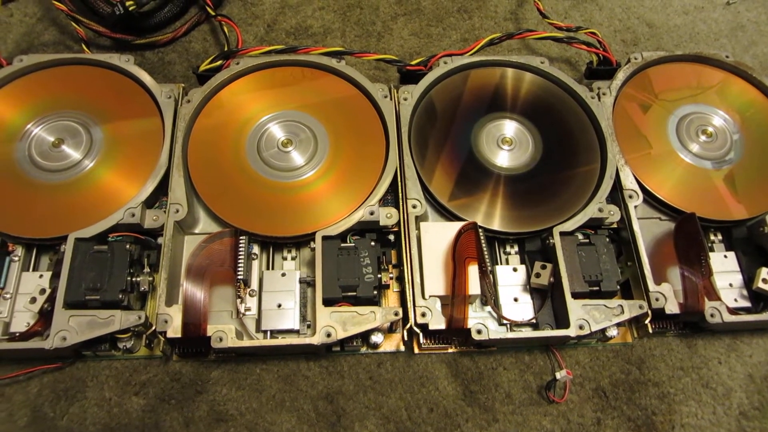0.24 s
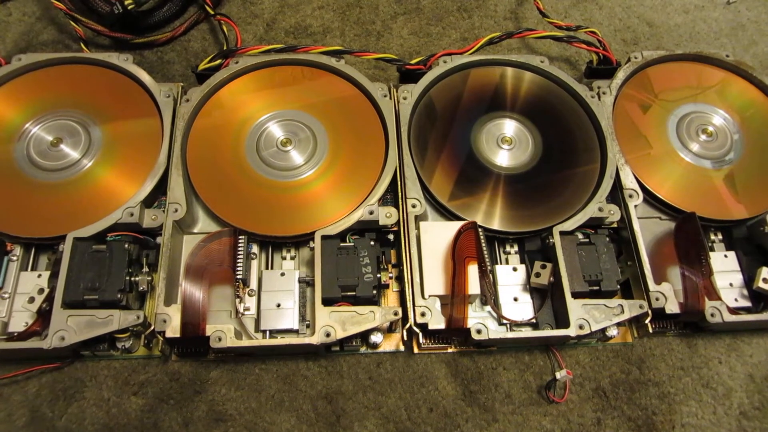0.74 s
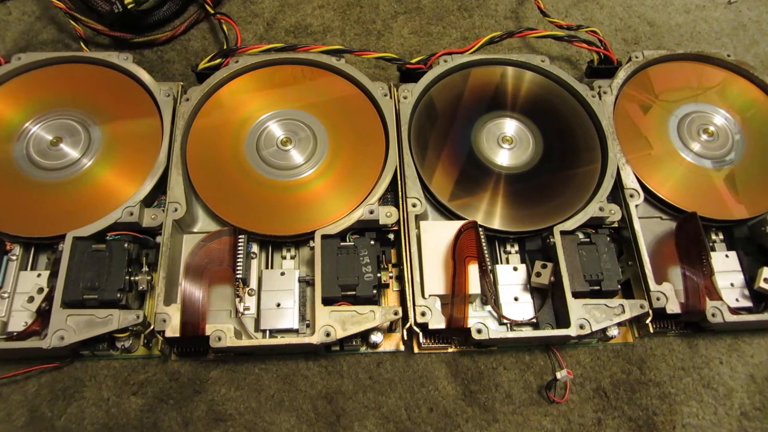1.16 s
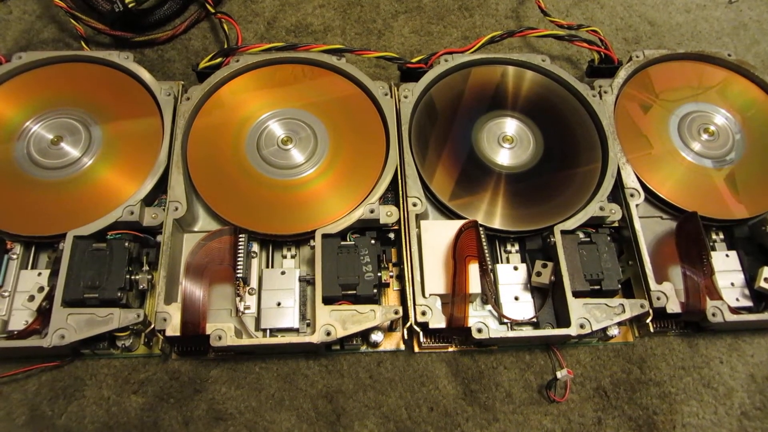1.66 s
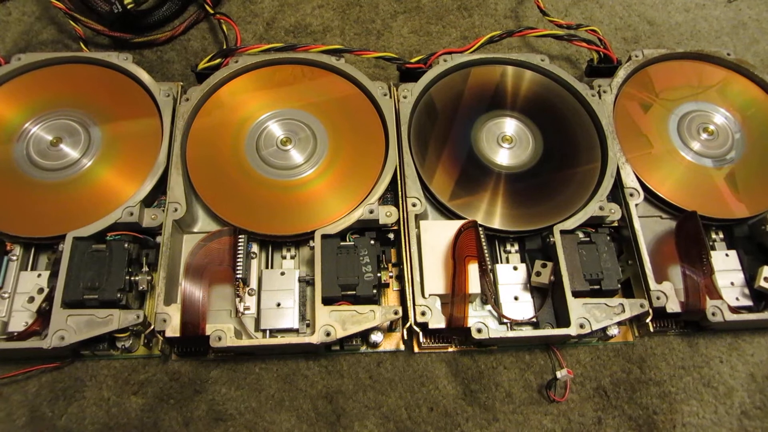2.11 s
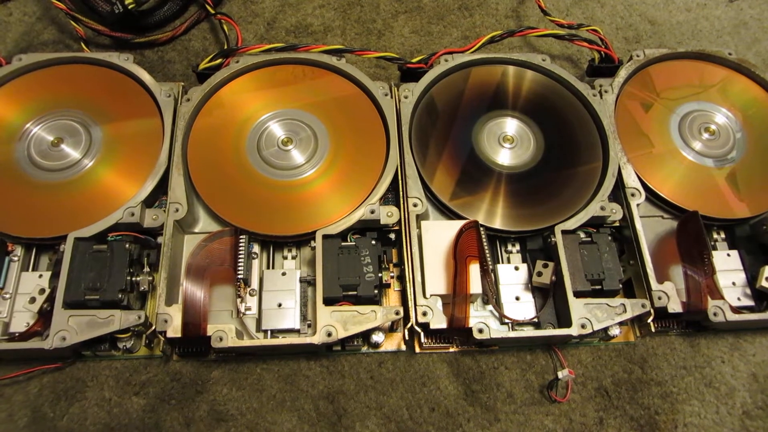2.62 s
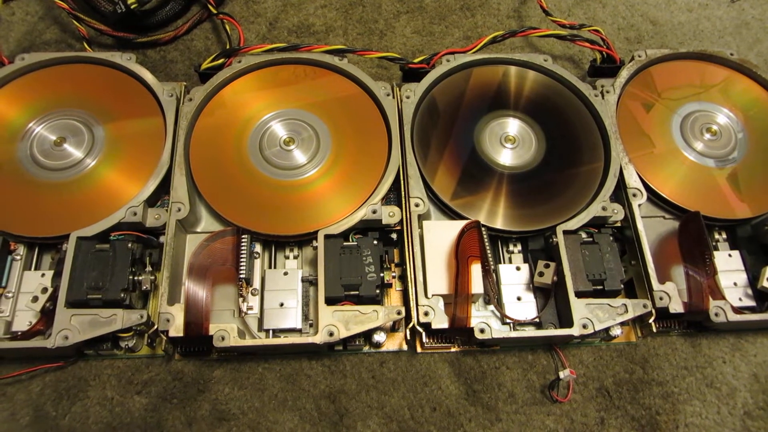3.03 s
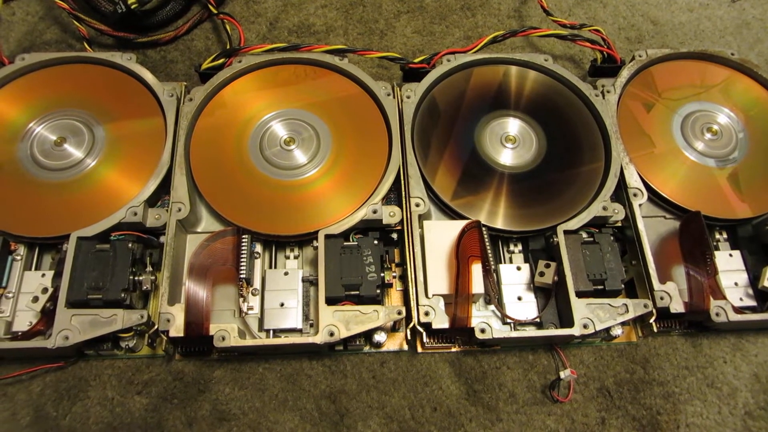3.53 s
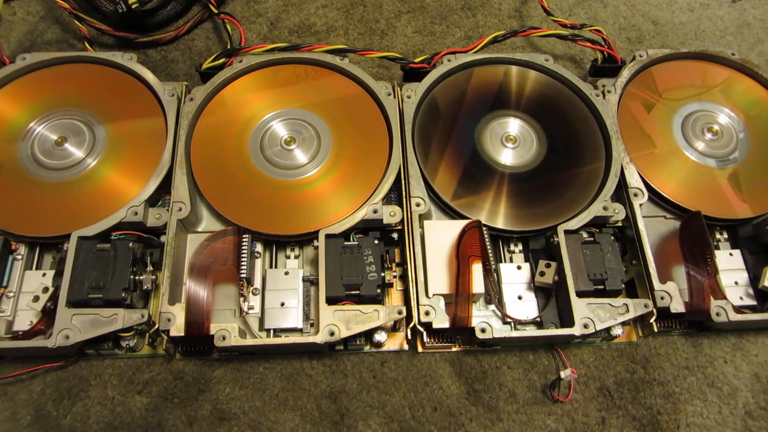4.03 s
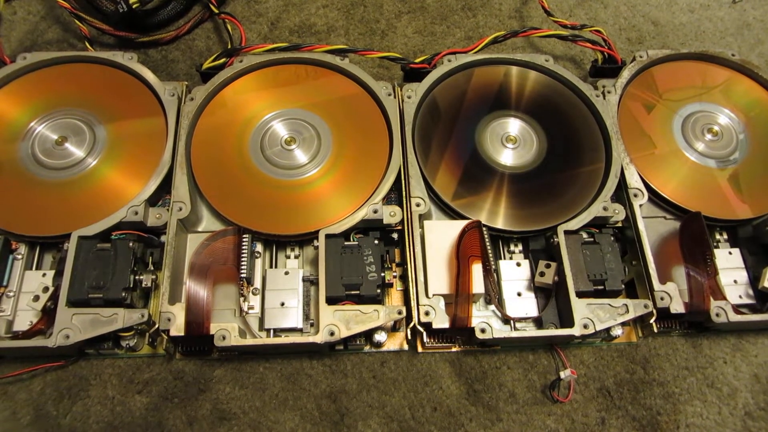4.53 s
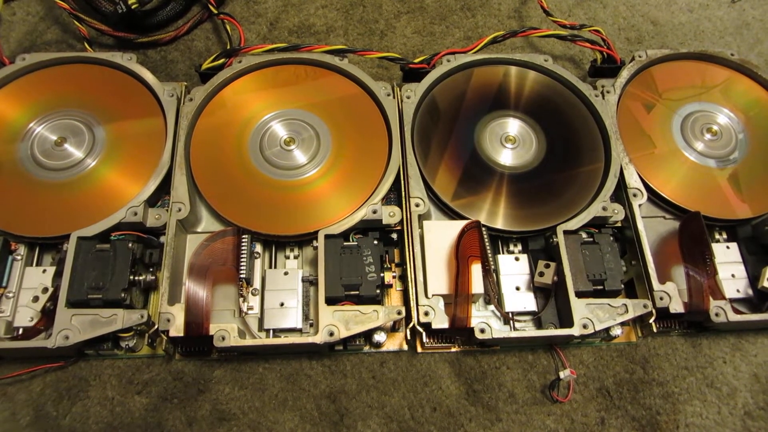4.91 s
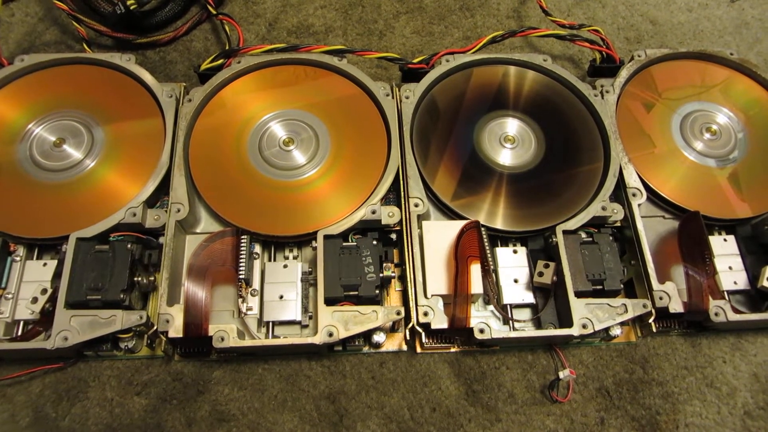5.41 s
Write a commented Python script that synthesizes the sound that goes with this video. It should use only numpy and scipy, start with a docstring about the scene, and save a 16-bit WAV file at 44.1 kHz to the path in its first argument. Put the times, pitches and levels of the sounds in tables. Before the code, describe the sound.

Close by in a quiet room, a group of open hard drives whirs up to speed. Layered motor whines and wavering, ringing bearing tones glide upward together above a constant hiss. The climb then stops and the drives hold a steady, high, many-toned whine, with a light buzz coming in underneath and a very faint electrical hum throughout.

```python
"""Several open hard drives spin up side by side on a carpet and lock at full speed.
Motor coils force the cast frames to vibrate at multiples of each shaft speed, so the hum rises in pitch.
Two ball bearings sing through the casting, while air and bearings whir and hiss in the frames.
Steady whines and a buzz join as the speeds lock. Beneath lie a brief low note, mains hum,
a screen's faint whistle, the quiet room and soft bumps of a hand on a small camera close by."""
import sys
import numpy as np
from scipy import signal
from scipy.fft import rfft, irfft, next_fast_len
from scipy.io import wavfile
from scipy.ndimage import uniform_filter1d

SR = 44100
rng = np.random.default_rng(int(sys.argv[2]) if len(sys.argv) > 2 else 0)


def digitize_waveform(pressure):
    """Quantize a signal to 16-bit integers and store it at the path in sys.argv[1].

    Rows of a 2-D input are taken as channels; values are limited to [-1, 1].
    """
    field = np.atleast_2d(pressure).T
    bounded = np.clip(field, -1, 1)
    quanta = np.round(bounded * 32767).astype(np.int16)
    wavfile.write(sys.argv[1], SR, quanta)


N = 249606

# Shaft rotation: start_hz, free_hz, time_constant_s, held_hz
FIRST_SHAFT = (34.353, 126.19, 13.036, 60.6)
SECOND_SHAFT = (34.8, 112.88, 11.145, 59.18)
THIRD_SHAFT = (37.0, 124.72, 11.886, 60.65)
# Driving force, one row a shaft: start_db, drift_db_per_s, lock_change_db, half_transition_s
MOTOR_EFFORT = [(0.5, 0, -4.5, 0.14), (-2, 0.5, -2, 0.26), (10, -2, -40, 0.34)]
# Motor partials, in parallel lists: order (multiple of shaft speed), level_db, lock_change_db
FIRST_MOTOR_ORDERS = [6, 12, 13, 16, 18, 19, 22, 23, 24, 25, 30, 36]
FIRST_MOTOR_DB = [15.5, 13, -3, -5.5, 10.5, -5.5, -11, -9, 9, -7, 8.5, 7]
FIRST_LOCK_DB = [-8, -0.5, 0.5, -12, -4, 10.5, -5, -7, -3.5, -3, -18, 10]
FIRST_UPPER_ORDERS = [28, 42, 42.95, 44, 44.95, 48, 54, 56.14, 58.13, 60, 64.03, 66, 89.9]
FIRST_UPPER_DB = [1, 3.5, -8.5, -5, -2, 2, 7, -3, -2, 10, -6, 8.5, -1]
FIRST_UPPER_LOCK_DB = [1, 4, 23.5, -3, 13, -14, -9, 5, 5, -12, 15, -3, 2]
THIRD_MOTOR_ORDERS = [6, 12, 18, 23.05, 24, 30]
THIRD_MOTOR_DB = [10.5, -1, -4, -11.5, -3, -10]
# Further motor tones that climb in step with the second shaft and ease at lock: order, level_db
FURTHER_TONE_ORDERS = [12.25, 18.38, 28.19, 31.75, 34.39, 36.77]
FURTHER_TONE_DB = [-3.5, -9, -7, 7, 6, 4]
# Second drive's bearing, one row a ball-pass harmonic with sidebands one shaft speed apart:
# two_below_db, one_below_db, carrier_db, one_above_db, two_above_db
BEARING_SIDEBANDS = [(-4, -2, 4, -2, -2), (-16, -6, 3, -1, -6), (-12, 3, 8.5, 5.5, -2),
                     (-7, 10.5, 11, 1, -4), (-4, 7, 6, 5, -6), (-3, 2, 9, 10.5, -8), (-5, 1, 8, 17, -2),
                     (-9, 0, 4, 4, -6), (-7, 1, 6, 3, -6), (-2, 10, 9, 7, -6), (-4, 8, 8, 8, -4),
                     (-4, 7, 7.5, 4, 1), (0, 2, 4, 0, 0), (-2, 3, -2, 0, -3), (-6, 4, 1, 0, 0),
                     (-8, 0, -8, -8, -8), (-8, -5, -2, -1, -6), (-6, -9, -2, -10, -7), (-9, 0, 0, 0, -4)]
# Swells and ebbs of that bearing: centre_s, change_db
BEARING_SWELLS = [(.15, 2.5), (.6, -3.5), (.85, 3.5), (1.15, -5), (1.45, 1), (1.68, -5.5), (2.28, 2),
                  (2.55, 0.5), (3.35, 0.2), (3.7, -0.5), (4.35, -4.5), (5.2, 2.5)]
# Third drive's bearing, in parallel lists: order, level_db
THIRD_BEARING_ORDERS = [24.86, 27.96, 28.76, 31.42, 35.1, 36.02, 37.4, 38.46, 40.03, 40.36, 41.8, 42.06,
                        44.87, 47.8]
THIRD_BEARING_DB = [-6, -2.5, -5, -1, -7, -8, -8, -6, -20, -4.5, -6, -2, -3, 0]
# Broad radiation curves: frequency_hz, gain_db
FRAME_RESPONSE = [(200, -96), (300, -76.5), (420, -71.5), (510, -73.5), (580, -85.5), (640, -70),
                  (660, -79.5), (690, -57), (830, -55), (930, -48.5), (1120, -49), (1200, -61),
                  (1290, -57.5), (1450, -39), (1700, -45.5), (1850, -45), (2050, -49), (2600, -46)]
CASTING_RESPONSE = [(900, -61), (1250, -65), (1350, -48.5), (1450, -38), (1550, -35), (1600, -35),
                    (1660, -37.5), (1730, -36), (1800, -38), (1880, -37), (1960, -42.5), (2050, -48),
                    (2130, -48.5), (2200, -49.5), (2300, -53.5), (2400, -57.5), (2600, -60.5),
                    (2780, -63.5), (2890, -62), (3000, -59.5), (3080, -73), (3250, -66.5), (3600, -62.5),
                    (3900, -61), (4400, -55), (5400, -52), (6700, -55.5)]
# Resonances: centre_hz, width_hz, lift_db
FRAME_MODES = [(1690, 61, 11), (1790, 420, 0.5)]
CASTING_MODES = [(1620, 60, 4), (1810, 70, 6), (2200, 90, 8), (2850, 160, 9), (3900, 150, 3),
                 (5400, 200, 3)]
HISS_MODES = [(3040, 180, 2), (3960, 170, 2), (4310, 150, 1), (4840, 190, 2.5), (5340, 230, 2.5),
              (8500, 420, 3.5)]
# Whines, in parallel lists: pitch_hz, level_db
WHINE_PITCHES = [1340, 1567, 1697, 1722, 1820, 1882, 2228, 2288, 2347]
WHINE_LEVELS = [-47, -35, -33, -42, -36, -38, -38, -33.5, -34.5]
# Buzz harmonics from the fundamental up: level_db
BUZZ_HARMONICS = [-70.5, -65.5, -67, -53.5, -64, -49]
# Spells of buzzing: start_s, end_s, gain_db
BUZZ_SPELLS = [(3.943, 4.15, 6.5), (4.312, 4.82, 8.5), (4.82, 6, 4)]
# Brief low note: pitch_hz, start_s, end_s, level_db
BRIEF_NOTE = (330, 1.35, 1.66, -56)
# Mains hum and screen whistle, in parallel lists: pitch_hz, level_db
ELECTRIC_PITCHES = [59, 120, 15734]
ELECTRIC_LEVELS = [-70, -60.5, -78]
# Air noise envelopes: time_s, whir_db, hiss_db
AIR_LEVELS = [(0, -23, -33.5), (.4, -26, -33.5), (.8, -23, -34), (1.1, -24, -33.5), (1.4, -25, -34.5),
              (1.7, -26.5, -36.5), (2.1, -26, -34), (2.4, -26, -34.5), (2.8, -26, -34), (3.3, -23.5, -31.5),
              (3.6, -25.5, -33), (4, -23, -32.5), (4.3, -26.5, -30.5), (4.6, -24.5, -31.5),
              (5.1, -24, -30.5), (5.66, -25.5, -31)]
# Noise spectra: frequency_hz, relative_density_db
WHIR_SPECTRUM = [(350, -108), (600, -63), (815, -25), (914, -20.5), (1230, -19), (1400, -5), (1570, 1.5),
                 (1870, -2.5), (2030, -7.5), (2250, -7.5), (2500, -20.5), (2900, -39), (3300, -24.5),
                 (4290, -56), (7260, -120)]
HISS_SPECTRUM = [(1650, -18), (2800, -0.5), (3210, -5.5), (3600, -4.5), (3840, -0.5), (4460, -3.5),
                 (5450, 0), (6620, -5.5), (8440, -9.5), (9670, -20), (10800, -15), (12000, -21),
                 (13600, -18), (14300, -22), (15500, -34)]
ROOM_SPECTRUM = [(12, -44), (20, -22), (38, -26), (86, -47), (119, -10), (151, -22.5), (318, -10.5),
                 (594, -16), (700, -8), (910, -20), (1540, -120)]
# Bumps of the hand: time_s, envelope_peak_db
HAND_BUMPS = [(0.199, -57), (0.979, -61), (2.149, -60), (3.249, -53), (4.229, -51.5), (4.879, -62.5),
              (5.416, -46)]
# Likeness of the noise on the two sides: frequency_hz, coherence (0 to 1)
NOISE_COHERENCE = [(60, 0), (300, 0.13), (700, 0.55), (1400, 1), (4000, 0.98), (7000, 0.95), (10000, 0.37),
                   (15000, 0.2)]
# Level difference between the microphone ports: frequency_hz, left_over_right_db
PORT_BALANCE = [(60, 12.5), (150, 9.5), (380, 7), (950, 6.5), (2380, 4), (5980, 2), (9000, -3), (15000, -1)]
# Phase difference between the ports: frequency_hz, left_lead_rad
PORT_PHASE = [(60, -2.16), (340, -1.95), (1290, -0.73), (2500, -0.55), (4220, -0.34), (6000, 0.75),
              (8600, 0.86), (15000, 0.1)]


def motor(shaft, orders, levels_db, effort_db, flicker_db):
    """Forced vibration: coil switching or a rolling bearing shakes a drive at multiples of shaft speed."""
    angle = shaft_angle(shaft)
    return amp(effort_db) * sum(tone(k * angle, db, flicker_db) for k, db in zip(orders, levels_db))


def shaft_speed(shaft):
    """First-order lag: turns per second climb towards the free speed until the controller holds them."""
    start_hz, free_hz, lag_s, held_hz = shaft
    return np.minimum(free_hz - (free_hz - start_hz) * np.exp(-np.arange(N) / SR / lag_s), held_hz)


def shaft_angle(shaft):
    """Angle in radians is the integral of angular speed."""
    return 2 * np.pi * np.cumsum(shaft_speed(shaft)) / SR


def lock_time(shaft):
    """The exponential approach, inverted, gives the time in seconds at which the held speed is reached."""
    start_hz, free_hz, lag_s, held_hz = shaft
    return lag_s * np.log((free_hz - start_hz) / (free_hz - held_hz))


def effort(shaft, rule):
    """Driving force in dB: it may drift slowly, and it drops around the moment of lock."""
    start_db, drift_db_per_s, change_db, half_s = rule
    locked = ramp(lock_time(shaft) - half_s, 2 * half_s)
    return start_db + drift_db_per_s * np.arange(N) / SR + change_db * locked


def shift_at_lock(levels_db, changes_db, over_s):
    """Timbre follows excitation: the first motor's partials change level as its current falls at lock."""
    locked = ramp(lock_time(FIRST_SHAFT), over_s)
    return [db + change * locked for db, change in zip(levels_db, changes_db)]


def motor_frames():
    """Source and filter: the partials of the motors glide through the fixed resonances of the frames."""
    first_db, further_db, third_db = map(effort, (FIRST_SHAFT, SECOND_SHAFT, THIRD_SHAFT), MOTOR_EFFORT)
    partials_db = shift_at_lock(FIRST_MOTOR_DB, FIRST_LOCK_DB, over_s=0.018)
    first = motor(FIRST_SHAFT, FIRST_MOTOR_ORDERS, partials_db, first_db, flicker_db=1.6)
    further = motor(SECOND_SHAFT, FURTHER_TONE_ORDERS, FURTHER_TONE_DB, further_db, flicker_db=3)
    third = motor(THIRD_SHAFT, THIRD_MOTOR_ORDERS, THIRD_MOTOR_DB, third_db, flicker_db=4)
    # The third frame radiates less above 1020 Hz.
    third = filtered(third, lambda hz: amp(-15 * np.clip((hz - 1020) / 60, 0, 1)))
    return filtered(first + further + third, radiation(FRAME_RESPONSE, FRAME_MODES))


def bearing_song(passes_per_turn=4.5, lowest_harmonic=6, swell_s=0.058, speed_exponent=2.05):
    """Amplitude modulation: balls knock on a flaw in the race, and the turning load adds sidebands."""
    angle = shaft_angle(SECOND_SHAFT)
    early = 1 - ramp(0, 2.5)  # at first the carriers stand out from their sidebands
    song = 0
    for harmonic, row in enumerate(BEARING_SIDEBANDS, lowest_harmonic):
        scatter_rad = min(np.pi, harmonic * 0.17)  # higher tones are less in step
        for sideband, db in enumerate(row, -2):
            early_db = -11 if sideband < 0 else -5 if sideband > 0 else 4
            order = harmonic * passes_per_turn + sideband
            song += tone(order * angle, db + early * early_db, flicker_db=1.72, scatter_rad=scatter_rad)
    t = np.arange(N) / SR
    swell_db = sum(db * np.exp(-((t - centre_s) / swell_s) ** 2) for centre_s, db in BEARING_SWELLS)
    speed_fraction = shaft_speed(SECOND_SHAFT) / SECOND_SHAFT[-1]
    return amp(2.5 + swell_db) * speed_fraction ** speed_exponent * song


def casting():
    """Structure-borne sound: both bearings and the first motor's upper partials excite the casting."""
    upper_db = shift_at_lock(FIRST_UPPER_DB, FIRST_UPPER_LOCK_DB, over_s=0.03)
    upper = motor(FIRST_SHAFT, FIRST_UPPER_ORDERS, upper_db, effort_db=0, flicker_db=1.5)
    drop_db = -8 * ramp(lock_time(THIRD_SHAFT), 0.18)
    rattle = motor(THIRD_SHAFT, THIRD_BEARING_ORDERS, THIRD_BEARING_DB, drop_db, flicker_db=-1)
    return filtered(bearing_song() + upper + rattle, radiation(CASTING_RESPONSE, CASTING_MODES))


def steady_tones(buzz_hz=231.5):
    """Superposition of fixed pitches: whines from the second lock on, buzz, low note, hum and whistle."""
    buzz_gain = sum(amp(db) * gate(start_s, end_s) for start_s, end_s, db in BUZZ_SPELLS)
    buzz = buzz_gain * partials(buzz_hz * np.arange(1, len(BUZZ_HARMONICS) + 1), BUZZ_HARMONICS)
    whines = ramp(lock_time(SECOND_SHAFT), 0.06) * partials(WHINE_PITCHES, WHINE_LEVELS)
    pitch_hz, start_s, end_s, level_db = BRIEF_NOTE
    low_note = gate(start_s, end_s) * partials([pitch_hz], [level_db])
    hum_and_whistle = partials(ELECTRIC_PITCHES, ELECTRIC_LEVELS, flicker_db=0)
    return whines + buzz + low_note + hum_and_whistle


def air_noise(passes_per_turn=4.5):
    """Modulated noise: air whirs in the frames; hiss pulses with each ball pass and first-platter turn."""
    whir_db, hiss_db = envelopes(AIR_LEVELS)
    ball_pulse = 0.11 * np.cos(passes_per_turn * shaft_angle(SECOND_SHAFT))
    platter_pulse = 0.025 * sum(np.cos(k * shaft_angle(FIRST_SHAFT)) for k in range(1, 4))
    whir = amp(whir_db + 0.092 * wobble(4.7)) * stereo_noise(WHIR_SPECTRUM, patchy_db=1.5)
    hiss_gain = amp(hiss_db + 0.27 * wobble(12) + 0.5 * wobble(6)) * (1 + ball_pulse + platter_pulse)
    return whir + hiss_gain * stereo_noise(HISS_SPECTRUM, patchy_db=0.76, modes=HISS_MODES)


def hand_bumps(pitch_hz=28, half_width_s=0.047):
    """Wave packets: each bump of the hand is a very low oscillation under a Gaussian envelope."""
    t = np.arange(N) / SR
    return sum(amp(db) * np.exp(-((t - time_s - 0.03) / half_width_s) ** 2)
               * np.sin(2 * np.pi * pitch_hz * (t - time_s)) for time_s, db in HAND_BUMPS)


def room_noise(level_db=-55.5):
    """Ambient noise floor: the quiet room is a low rush whose level wavers."""
    return amp(level_db + 1.5 * wobble(4)) * stereo_noise(ROOM_SPECTRUM, patchy_db=1.5)


def tone(angle, level_db, flicker_db, scatter_rad=np.pi):
    """Random amplitude modulation: a sinusoid with a random phase offset flickers about an rms level."""
    amplitude = np.sqrt(2) * amp(level_db + flicker_db * wobble(9))
    return amplitude * np.cos(angle + scatter_rad * rng.uniform(-1.136, 1))


def partials(pitches_hz, levels_db, flicker_db=2):
    """Additive synthesis: a sum of tones of constant frequency."""
    t = np.arange(N) / SR
    return sum(tone(2 * np.pi * hz * t, db, flicker_db) for hz, db in zip(pitches_hz, levels_db))


def stereo_noise(spectrum, patchy_db, modes=()):
    """Partial coherence: independent mid and side noises, with patches of random gain, mix to rms 1."""
    cells = signal.stft(rng.standard_normal((2, N)), nperseg=512)[2]
    patches = uniform_filter1d(rng.standard_normal(cells.shape[1:]), size=5, axis=0)  # over frequency
    patches = uniform_filter1d(patches, size=12, axis=1)  # over time
    pair = signal.istft(cells * amp(patchy_db * unit_rms(patches)), nperseg=512)[1][:, :N]

    def response(hz):
        mix_rad = np.arccos(np.clip(log_interp(NOISE_COHERENCE, hz), -1, 1)) / 2
        return radiation(spectrum, modes)(hz) * [np.cos(mix_rad), np.sin(mix_rad)]
    mid, side = filtered(pair, response)
    return unit_rms(np.array([mid + side, mid - side]))


def radiation(broad, modes):
    """Resonance: each mode adds a Lorentzian peak in dB to a broad frequency response."""
    def response(hz):
        lift_db = sum(db / (1 + (2 * (hz - centre) / width) ** 2) for centre, width, db in modes)
        return amp(log_interp(broad, hz) + lift_db)
    return response


def filtered(x, response):
    """Linear filtering multiplies the spectrum by a response; mirrored ends let it run in smoothly."""
    edge = SR // 4
    padded = np.pad(x, [(0, 0)] * (x.ndim - 1) + [(edge, edge)], "reflect")
    size = next_fast_len(N + 2 * edge)
    return irfft(rfft(padded, size) * response(np.fft.rfftfreq(size, 1 / SR)), size)[..., edge:edge + N]


def amp(db):
    """Amplitude ratio: tenfold for every 20 dB."""
    return 10 ** (np.asarray(db) / 20)


def unit_rms(x):
    """Normalisation to a mean power of 1."""
    return x / np.sqrt(np.mean(x ** 2) + 1e-20)


def log_interp(points, hz):
    """Interpolation of (frequency_hz, value) points on a logarithmic frequency axis."""
    knots_hz, values = np.transpose(points)
    return np.interp(np.log(hz + 1), np.log(knots_hz + 1), values)


def envelopes(rows):
    """Linear interpolation in time of each column after time_s."""
    times_s, *columns = np.transpose(rows)
    return [np.interp(np.arange(N) / SR, times_s, column) for column in columns]


def wobble(rate_hz):
    """Slow fluctuation: straight lines join Gaussian values drawn at rate_hz."""
    knots = rng.standard_normal(400)
    return np.interp(np.arange(N) * rate_hz / SR, np.arange(len(knots)), knots)


def ramp(start_s, rise_s):
    """Linear onset from 0 to 1."""
    return np.clip((np.arange(N) / SR - start_s) / rise_s, 0, 1)


def gate(start_s, end_s):
    """Trapezoidal envelope with a short attack and release."""
    return ramp(start_s, 0.026) - ramp(end_s, 0.021)


def scene():
    """Superposition: the pressures of all sources add."""
    return motor_frames() + casting() + steady_tones() + hand_bumps() + air_noise() + room_noise()


def record(dry, band_limit_hz=15770):
    """Stereo cues: the two ports differ in level and phase; nothing passes above the band limit."""
    def response(hz):
        left = amp(log_interp(PORT_BALANCE, hz) / 2) * np.exp(0.5j * log_interp(PORT_PHASE, hz))
        return np.array([left, 1 / left]) * (hz < band_limit_hz)
    return filtered(dry, response)


dry = scene()
out = record(dry)
digitize_waveform(out)
```